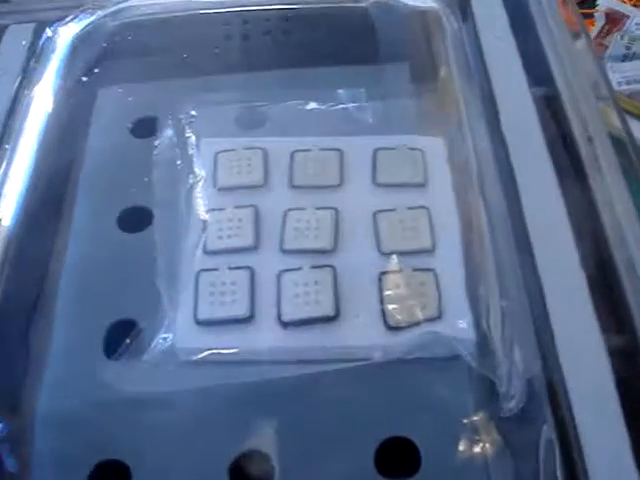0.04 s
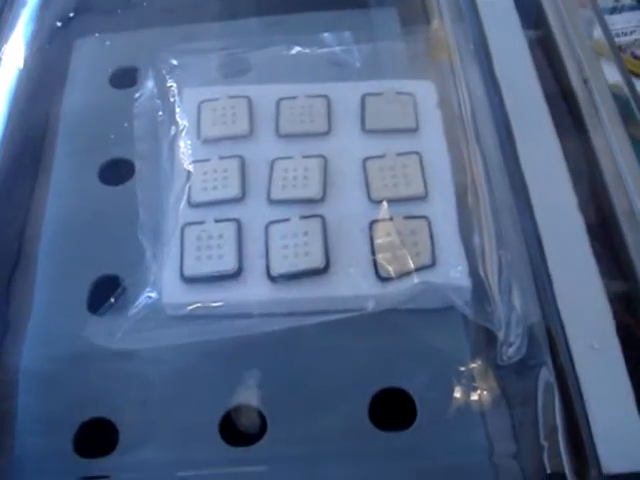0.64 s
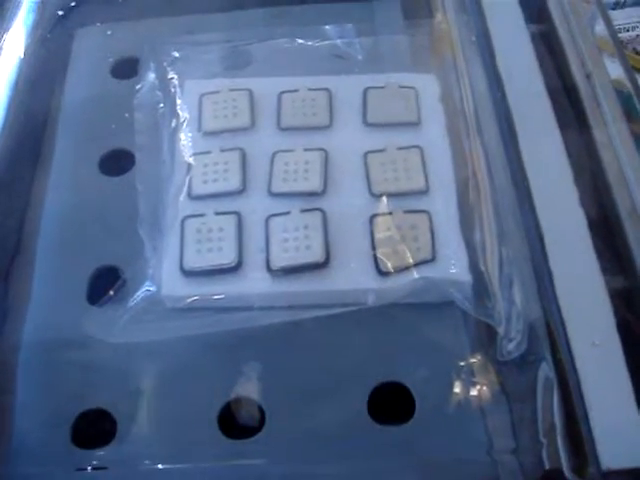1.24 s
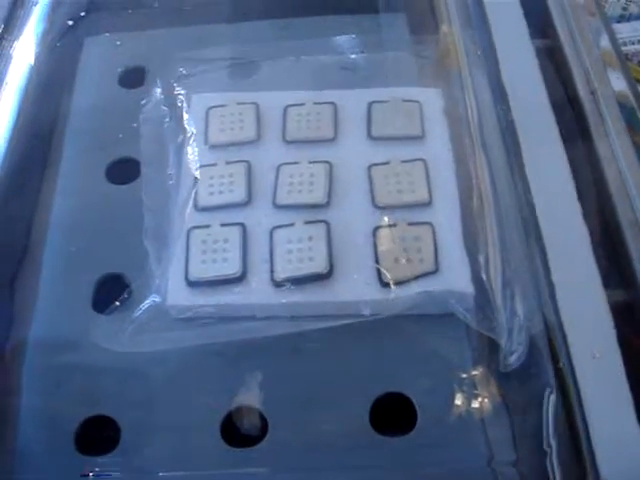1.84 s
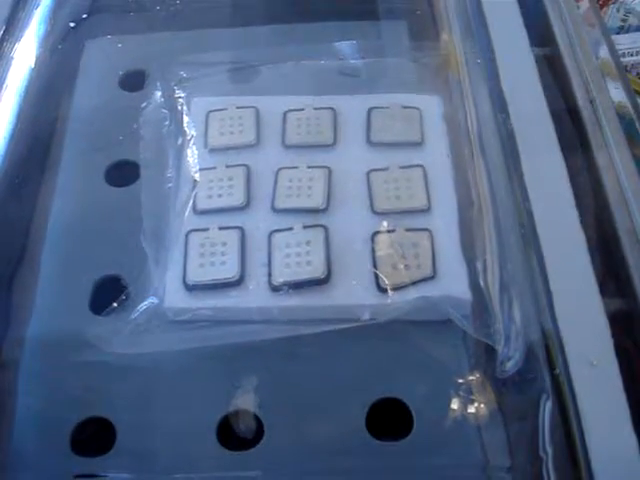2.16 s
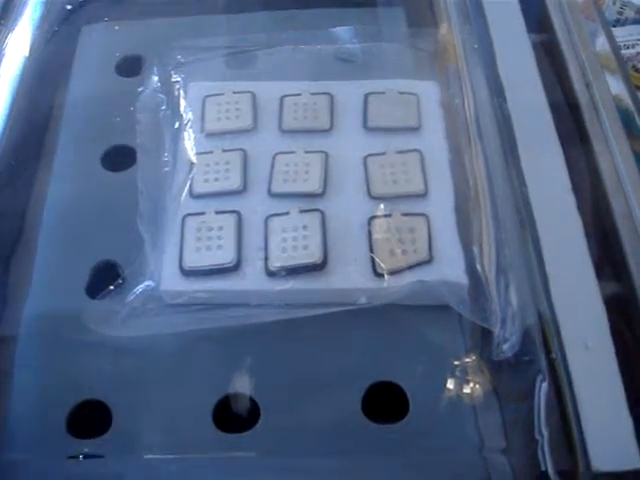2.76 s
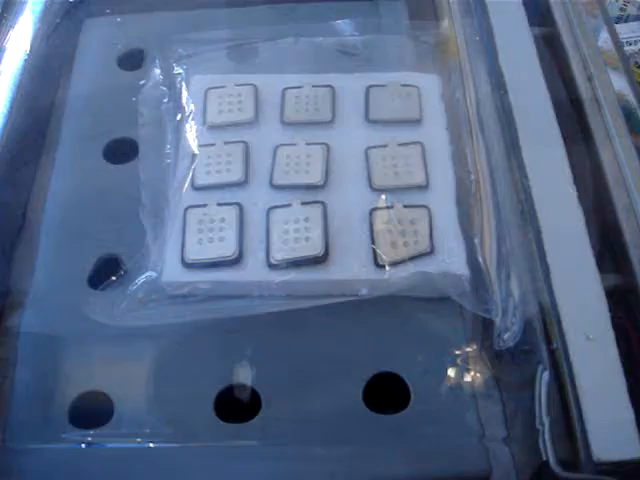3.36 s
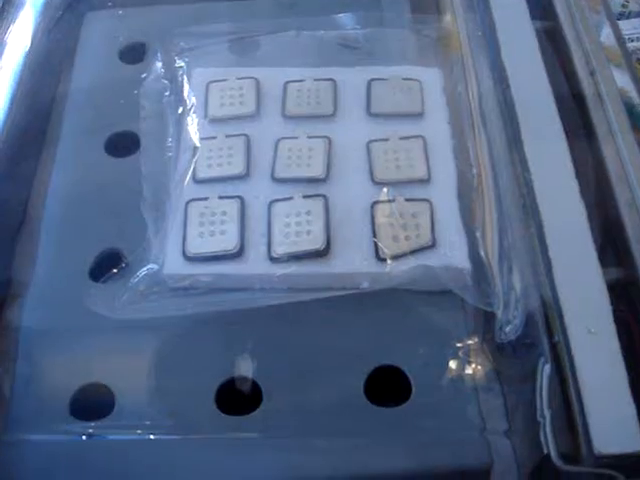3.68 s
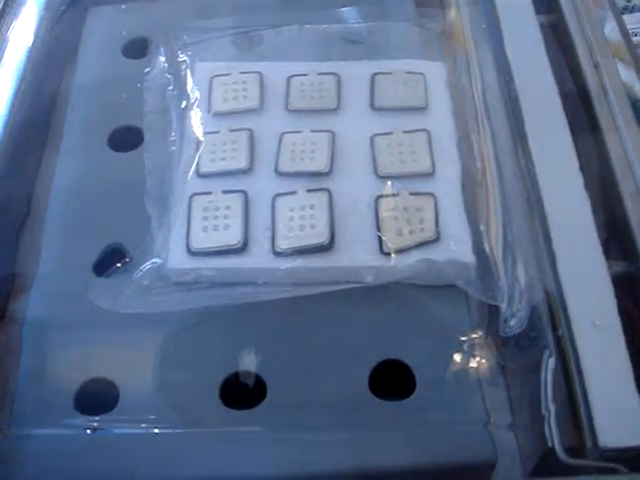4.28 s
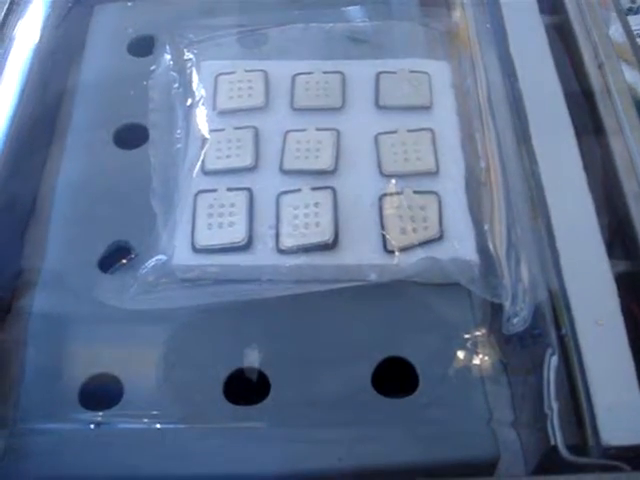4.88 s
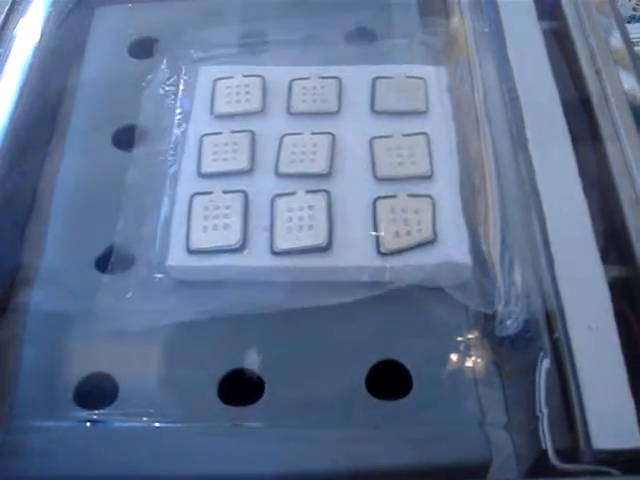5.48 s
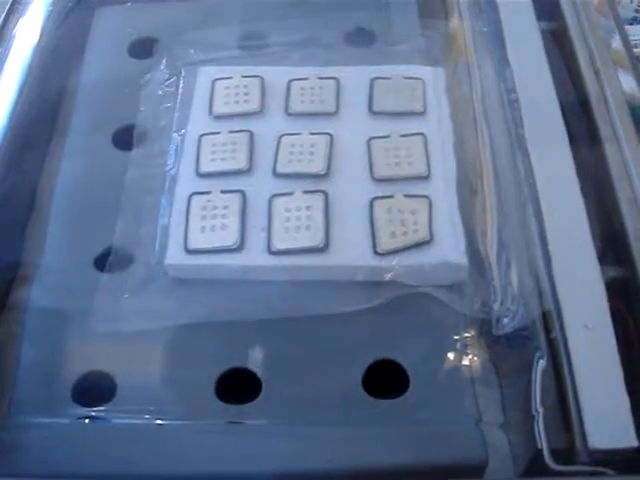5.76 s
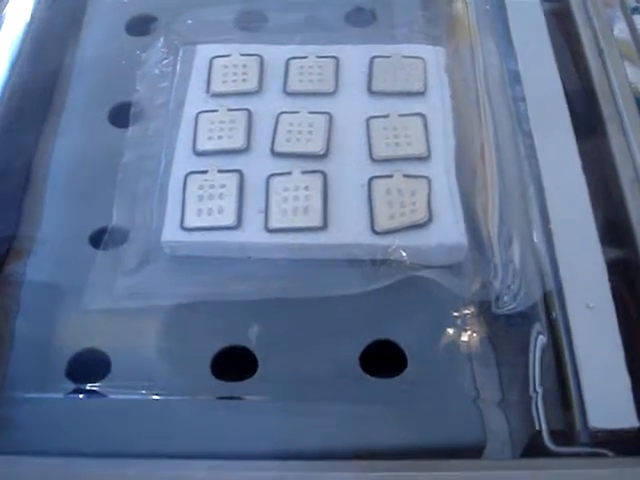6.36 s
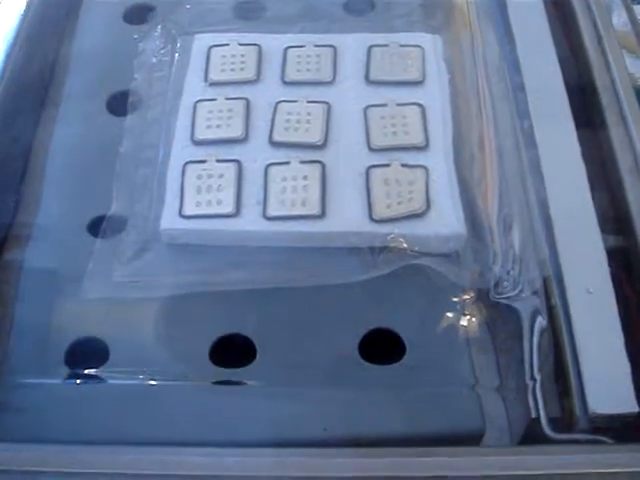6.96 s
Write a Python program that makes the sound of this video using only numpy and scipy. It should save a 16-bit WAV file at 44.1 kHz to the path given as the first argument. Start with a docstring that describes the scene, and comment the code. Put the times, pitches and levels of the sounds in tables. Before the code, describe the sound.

A vacuum packer's pump rasps and stops, valves clunk and a contactor snaps, then air rushes loudly back into the chamber and fades.

```python
"""Vacuum packer in a workshop

A chamber vacuum packer runs through its cycle between hard walls, over the faint whine of a fan.
The vane pump hums and rasps through its exhaust, then stops. Valves and the seal bar clunk, air seeps
and whistles through the valves, and the sealing contactor snaps on and off. Last, the vent valve lets
air rush back into the chamber until the pressure has evened out."""
import sys
import numpy as np
from scipy import signal
from scipy.fft import rfft, irfft, next_fast_len
from scipy.io import wavfile

SR = 44100
rng = np.random.default_rng(int(sys.argv[2]) if len(sys.argv) > 2 else 0)


def inscribe(sig):
    """Save sig as 16-bit PCM at rate SR to the path in sys.argv[1].

    A 1-D sig is mono; a 2-D sig holds one channel per row.
    Samples are clipped to [-1, 1] before scaling.
    """
    pcm = np.round(np.clip(np.atleast_2d(sig).T, -1, 1) * 32767)
    wavfile.write(sys.argv[1], SR, pcm.astype(np.int16))


N = 313992
TIME = np.arange(N) / SR
CUTOFF_HZ = 10060


def from_db(db):
    """Decibels to gain."""
    return 10 ** (np.asarray(db) / 20)


def rms_one(x):
    """Scale to unit rms."""
    return x / np.sqrt(np.mean(x ** 2) + 1e-20)


def at_hz(points, hz):
    """Read a curve on a log-frequency axis."""
    freqs, values = np.transpose(points)
    return np.interp(np.log(hz), np.log(freqs), values)


def drift(rate):
    """A random wobble of about unit size that changes course rate times a second."""
    knots = rng.standard_normal(2000)
    return np.interp(TIME * rate, np.arange(len(knots)), knots)


def noise(colour, resonances=(), size=N):
    """Noise of a broad colour, lifted at each resonance, at unit rms."""
    padded = next_fast_len(size, True)
    hz = np.maximum(np.fft.rfftfreq(padded, 1 / SR), 1)
    power = 1 + sum((from_db(lift) ** 2 - 1) / (1 + (2 * (hz - centre) / width) ** 2)
                    for centre, width, lift in resonances)
    gain = from_db(at_hz(colour, hz)) * np.sqrt(np.abs(power))
    white = rfft(rng.standard_normal(padded))
    return rms_one(irfft(white * gain, padded)[:size])


def split(x, hz):
    """A low-passed signal and the remainder."""
    low = signal.sosfiltfilt(signal.butter(4, hz, fs=SR, output="sos"), x)
    return low, x - low


def fade_after(stop_s, t60):
    """Full level until the stop, then down by 60 dB every t60 seconds."""
    return from_db(-60 * np.maximum(TIME - stop_s, 0) / t60)


# The pump's hum. Each row: multiple of the shaft rate, starting level in dB, easing in dB per second.
HUM = [(2, -57, 12), (3, -53.5, 3), (4, -51.5, 10), (6, -53, 11)]
# The colour of the exhaust rasp. Each row: frequency in Hz, relative level in dB.
EXHAUST_COLOUR = [(40, -35), (100, -51), (330, -24), (520, -24.5), (950, -16.5), (1250, -11.5), (1750, -5),
                  (2300, -14), (3000, -22), (4300, -21.5), (5400, -13.5), (6600, -22), (8300, -28.5),
                  (10000, -30)]
# The resonances of the exhaust outlet. Each row: centre in Hz, width in Hz, lift in dB.
OUTLET_MODES = [(916, 6.6, 9.4), (1544, 27, 7), (1690, 12, 10.9), (1706, 11, 5.5), (1727, 36, 7.2),
                (1770, 28, 2.9), (1853, 27, 7.2), (1863, 20, 1.4), (2017, 20, 8.2), (2330, 20, 3),
                (2500, 23, 6.3), (3090, 18, 9.7)]


def pump(shaft_hz=48.3, exhaust_db=-24.5, unloaded_s=1.15, stop_s=1.655):
    """The vanes rasp out three puffs a turn; the hum eases as the chamber empties and dies unloaded."""
    turn = 2 * np.pi * np.cumsum(shaft_hz * (1 + 0.0016 * drift(12))) / SR
    hum = 0
    for multiple, db, easing in HUM:
        level = from_db(db - easing * TIME + 0.2 * drift(5.4))
        hum += np.sqrt(2) * level * np.sin(multiple * turn + rng.uniform(0, 2 * np.pi))
    puffs = 1 + 0.036 * np.sin(3 * turn)
    rasp = noise(EXHAUST_COLOUR, OUTLET_MODES) * puffs * from_db(exhaust_db + 0.2 * drift(25.3))
    return fade_after(stop_s, t60=1) * rasp + fade_after(unloaded_s, t60=0.46) * hum


# The colour of the room tone. Each row: frequency in Hz, relative level in dB.
ROOM_COLOUR = [(15, -65.5), (25, -29.5), (233, -6.5), (264, -8), (299, -8.5), (339, -9.5), (375, -7.5),
               (574, -13), (775, -9), (1310, -16), (3240, -21.5), (3490, -23), (8180, -34.5), (10000, -43),
               (13000, -77), (22000, -120)]
# The fan's whine. Each row: pitch in Hz, level in dB.
FAN_TONES = [(301.5, -61), (802.1, -65.5), (1593, -71.5), (1825, -83.5), (2336, -70), (3198, -67),
             (4802, -77), (6401, -78), (7866, -74)]


def workshop(room_db=-47, wander_rad=0.6):
    """A steady bed of room tone under a fan whose tones waver slightly in pitch."""
    fan = sum(np.sqrt(2) * from_db(db) * np.sin(2 * np.pi * hz * TIME + wander_rad * drift(26))
              for hz, db in FAN_TONES)
    return from_db(room_db) * noise(ROOM_COLOUR) + fan


def ringing(colour, modes, t, clean_width_hz=28):
    """A struck part's pure ring: a sine per mode with that resonance's power, less for broad modes."""
    total_power = np.sum(from_db(at_hz(colour, np.arange(20, CUTOFF_HZ))) ** 2)
    ring = 0
    for hz, width, lift in modes:
        level = from_db(at_hz(colour, hz) + lift) * np.sqrt(np.pi * width / total_power)
        purity = min(1, clean_width_hz / width)
        ring += level * purity * np.sin(2 * np.pi * hz * t + rng.uniform(0, 2 * np.pi))
    return ring


# The decay of the hard-walled room. Each row: frequency in Hz, seconds to fall by 60 dB.
ROOM_T60 = [(100, 1.58), (300, 1.1), (800, 1.17), (2000, 1.28), (5000, 0.97), (10000, 0.87)]


def room_tail(sound, t):
    """Diffuse reflections of a blow: each octave dies at its own rate."""
    tail = 0
    for hz in 100 * 2 ** np.arange(8):
        band, sound = split(sound, hz * np.sqrt(2))
        tail += band * from_db(-60 * t / at_hz(ROOM_T60, hz))
    return tail


# The colour of each moving part. Each row: frequency in Hz, relative level in dB.
PUMP_VALVE = [(50, -27), (100, -23.5), (180, -1), (300, 0.5), (460, -4.5), (700, -7), (1150, 0.5),
              (1600, -8.5), (2800, -9), (4250, -3.5), (5800, -14), (7600, -13), (10000, -24.5)]
SEAL_BAR = [(50, -24), (120, -12), (220, -8), (310, -1.5), (470, -10), (660, -3), (1200, -13),
            (2200, -11.5), (4200, -12), (7500, -16), (10000, -43)]
BAR_VALVE = [(50, -32), (110, -7), (230, -7), (370, 2.5), (520, -8), (680, -6.5), (1200, -3.5), (1700, -11),
             (3100, -7), (3900, -15.5), (5400, -5.5), (6400, -10), (8100, -12), (10000, -24.5)]
CONTACTOR_ON = [(60, -26), (180, -28), (290, -4), (420, -27), (620, -9), (850, -2), (1100, -3), (1500, 5.5),
                (1950, 3.5), (2320, -4), (2700, 1), (4000, -5.5), (4700, 0), (7300, -4.5), (10000, -15)]
CONTACTOR_OFF = [(60, -24), (130, -17.5), (390, -5.5), (540, -7), (700, 0.5), (1000, -6.5), (1300, -2.5),
                 (1700, -9), (2800, -6), (3300, -15), (5000, -10.5), (7500, -18.5), (10000, -30)]
VENT_VALVE = [(25, -19), (80, -4), (200, 3), (480, 2), (1000, -2), (2500, -24), (4600, -1.5), (6000, -16),
              (7500, -8), (10000, -24)]
# The ring of each part. Each row: centre in Hz, width in Hz, full lift in dB.
PUMP_VALVE_MODES = [(178.5, 50, 1.5), (292, 52, 6.5), (1115, 43, 6), (1258, 63, 11.5), (1680, 33, 9),
                    (2800, 22, 6)]
SEAL_BAR_MODES = [(307, 33, 9.4), (358, 38, 5.8), (625, 40, 5.1), (700, 44, 5.4), (1870, 50, 4.5)]
BAR_VALVE_MODES = [(360, 37, 6.3), (383, 27, 8.9), (637, 31, 12.7), (822, 24, 12), (1090, 17, 2.8),
                   (1234, 33, 6), (2190, 36, 8.3), (2620, 28, 3.5), (3070, 40, 5), (5500, 480, 3),
                   (8220, 270, 4.1)]
CONTACTOR_ON_MODES = [(254, 10, 23), (297, 15, 12), (519, 18, 19), (730, 24, 11.6), (840, 8.3, 17),
                      (894, 20, 15.4), (1413, 14, 5.9), (1650, 23, 5.1), (1850, 52, 5.3), (2500, 18, 7.9),
                      (2830, 26, 6.4), (3450, 30, 4.4), (3400, 52, 14), (3330, 33, 7.1), (4600, 80, 15),
                      (4770, 39, 5.7), (4700, 37, 5.6), (5500, 26, 4.9), (6500, 84, 7.7)]
CONTACTOR_OFF_MODES = [(304, 35, 3.7), (388, 22, 5.1), (668, 30, 8.4), (725, 31, 6.9), (868, 17, 12),
                       (894, 22, 7), (1164, 44, 7.7), (1700, 70, 13), (2020, 27, 3.5), (2380, 40, 2.9),
                       (2920, 40, 4.9), (3590, 33, 6.8)]
VENT_VALVE_MODES = [(497, 48, 5.3), (4650, 220, 7.7), (7350, 710, 4.6)]
# One cue for each part above, in that order. Each row: start in seconds, burst level in dB, rise and
# burst t60 in seconds, tail level in dB, ring level in dB relative to the tail, colour, modes.
CLUNKS = [(1.680, -13, 0.014, 0.22, -18, -8.5, PUMP_VALVE, PUMP_VALVE_MODES),
          (1.754, -16.5, 0.0042, 0.19, -24.5, -9, SEAL_BAR, SEAL_BAR_MODES),
          (2.093, -17.5, 0.0061, 0.21, -25, -8, BAR_VALVE, BAR_VALVE_MODES),
          (3.126, -15, 0.0025, 0.21, -26, -2.5, CONTACTOR_ON, CONTACTOR_ON_MODES),
          (3.815, -20, 0.011, 0.23, -26, -5, CONTACTOR_OFF, CONTACTOR_OFF_MODES),
          (5.220, -11.5, 0.005, 0.29, -18.5, -4.5, VENT_VALVE, VENT_VALVE_MODES)]


def clunks(room_rise_s=0.025, rattle_db=1.5, burst_share=0.81, room_share=0.5):
    """Each blow of a valve, bar or contactor is a short rattling burst that rings on into the room."""
    out = np.zeros(N)
    t = np.arange(int(1.8 * SR)) / SR
    for start_s, burst_db, rise_s, t60, tail_db, ring_db, colour, modes in CLUNKS:
        attack = np.minimum(t / rise_s, 1)
        rattle = rattle_db * drift(300)[:len(t)]
        # the burst and its reflections each take a share of the modes' lift
        direct, diffuse = (noise(colour, [(hz, width, share * lift) for hz, width, lift in modes], len(t))
                           for share in (burst_share, room_share))
        burst = direct * from_db(burst_db - rattle - 60 * np.maximum(t - rise_s, 0) / t60)
        reflections = diffuse * (1 - np.exp(-t / room_rise_s))
        ring = from_db(ring_db) * ringing(colour, modes, t)
        tail = from_db(tail_db) * room_tail(reflections + ring, t)
        start = round(start_s * SR)
        out[start:start + len(t)] += (attack * (burst + tail))[:N - start]
    return out


# Soft hisses as the pump line closes, the seal bar presses down, the seal cools and the lid comes free.
# Each row: start in seconds, level in dB, then attack, hold and release t60 in seconds.
SEEPS = [(1.70, -34, 0.11, 0.018, 0.92), (2.15, -47.5, 0.51, 1.1, 2.3), (3.82, -58.5, 0.12, 1.1, 1.5),
         (6.867, -41, 0.11, 0.2, 0.8)]
# Their bright colour. Each row: frequency in Hz, relative level in dB.
SEEP_COLOUR = [(500, -23.5), (1800, -2), (3500, 2), (5500, 3), (8000, -0.5), (10000, -8.5)]


def seeps():
    """Air seeps through the valves: each hiss rises, holds and trails away."""
    power = 0
    for start_s, db, attack_s, hold_s, t60 in SEEPS:
        attack = np.clip((TIME - start_s) / attack_s, 0, 1)
        release = fade_after(start_s + attack_s + hold_s, t60)
        power += (from_db(db) * attack * release) ** 2
    return np.sqrt(power) * noise(SEEP_COLOUR)


# Breathy whistles: one as the pump line closes, two at the air inlet, one from the vent pipe's last air.
# Each row: start and length in seconds, starting pitch in Hz, level at the crest in dB, width in Hz.
WHISTLES = [(1.704, 0.4, 7900, -39.5, 640), (5.232, 1, 4955, -32, 240), (5.879, 0.74, 5460, -36.5, 260),
            (6.5, 0.68, 2045, -41, 380)]


def whistle(start_s, length_s, hz, db, width_hz, sag_octaves_per_s=0.42):
    """Air through a narrow gap: a band of noise swells and fades while its pitch sinks with the flow."""
    age = np.clip(TIME - start_s, 0, length_s)
    swell = np.sin(np.pi * age / length_s)
    phase = 2 * np.pi * np.cumsum(hz * 2 ** (-sag_octaves_per_s * age)) / SR
    lowpass = signal.butter(2, width_hz / 2, fs=SR, output="sos")
    wobble = signal.sosfilt(lowpass, rng.standard_normal((2, N)))
    return from_db(db) * swell * rms_one(wobble[0] * np.cos(phase) + wobble[1] * np.sin(phase))


# The colour of the inrushing air. Each row: frequency in Hz, relative level in dB.
JET_COLOUR = [(40, -36), (90, -20.5), (160, -6.5), (260, -13), (480, -6.5), (560, -6), (680, 2.5),
              (950, -0.5), (1400, 1), (2000, 5), (3000, 1), (4700, 1), (5500, -1.5), (7600, -9),
              (10000, -20.5)]
# The resonances of the chamber and vent pipe. Each row: centre in Hz, width in Hz, lift in dB.
CHAMBER_MODES = [(304, 12, 8.5), (388, 31, 15.5), (634, 23, 10), (680, 19, 4), (750, 20, 4), (849, 32, 12),
                 (914, 11, 1), (928, 13, 11), (1078, 13, 12.5), (1222, 11, 10.5), (1360, 18, 10),
                 (1616, 19, 4), (1720, 5.3, 13.5), (1818, 13, 7.5), (1915, 15, 4.5), (2420, 6.2, 9),
                 (2860, 9.8, 7.5), (3010, 8.9, 11.5), (3230, 19, 7.5), (3300, 11, 10.5), (3720, 84, 7),
                 (4070, 14, 11.5), (4415, 23, 11), (4600, 64, 6), (4780, 13, 10.5), (4845, 21, 9),
                 (6060, 160, 3)]
# The jet's roar, pipe hiss and treble. Each row: level at full flow in dB, exponent on the flow.
JET_BANDS = [(-22.5, 0.79), (-21.5, 1.42), (-24, 1.59)]


def vent(start_s=5.221, opening_s=0.0076, fill_s=1.93, flutter_db=0.5):
    """A jet fills the chamber and slows as the pressure evens out: treble and hiss go, then the roar."""
    age = TIME - start_s
    flow = np.clip(1 - age / fill_s, 1e-3, 1)
    roar, highs = split(noise(JET_COLOUR, CHAMBER_MODES), hz=2700)
    hiss, treble = split(highs, hz=5300)
    air = sum(from_db(db) * flow ** exponent * rms_one(band)
              for band, (db, exponent) in zip((roar, hiss, treble), JET_BANDS))
    opening = np.clip(age / opening_s, 0, 1)
    return opening * from_db(flutter_db * drift(27)) * air


# Standing waves around the machine. Each row: centre in Hz, width in Hz, boost or cut in dB.
STANDING_WAVES = [(120, 6.5, 3.5), (149, 6.6, 1.5), (226, 16, -4), (308, 18, 1.5), (320, 20, 0),
                  (375, 21, 0), (430, 62, -4), (596, 16, -2.5), (780, 25, 0.5), (963, 33, 1),
                  (1144, 30, -1.5)]


def housing(x):
    """Standing waves between the steel housing and the walls lift and hollow every sound."""
    for hz, width, lift in STANDING_WAVES:
        band = signal.lfilter(*signal.iirpeak(hz, hz / width, fs=SR), x)
        x = x + (from_db(lift) - 1) * band
    return x


def scene():
    """The whole cycle heard from above the lid, the same in both ears."""
    machine = pump() + clunks() + vent() + seeps() + sum(whistle(*row) for row in WHISTLES)
    mono = housing(machine + workshop())
    return np.stack([mono, mono])


def record(dry, ceiling=0.93):
    """Soft clipping rounds the loudest peaks, and a steep low-pass takes off the top."""
    rounded = ceiling * np.tanh(dry / ceiling)
    return signal.sosfilt(signal.ellip(16, .1, 80, CUTOFF_HZ, fs=SR, output="sos"), rounded)


dry = scene()
out = record(dry)
inscribe(out)
```